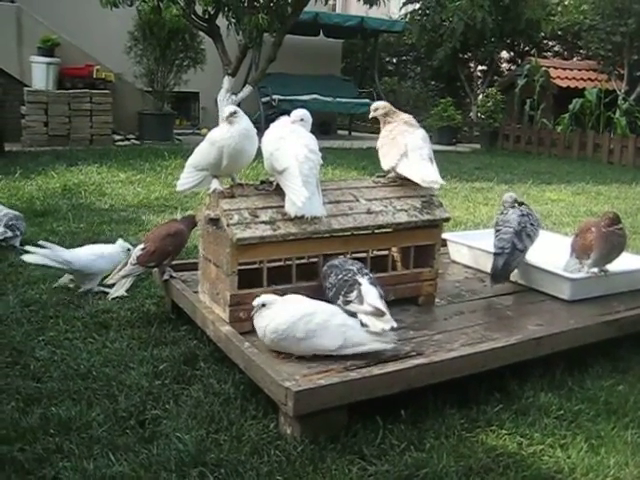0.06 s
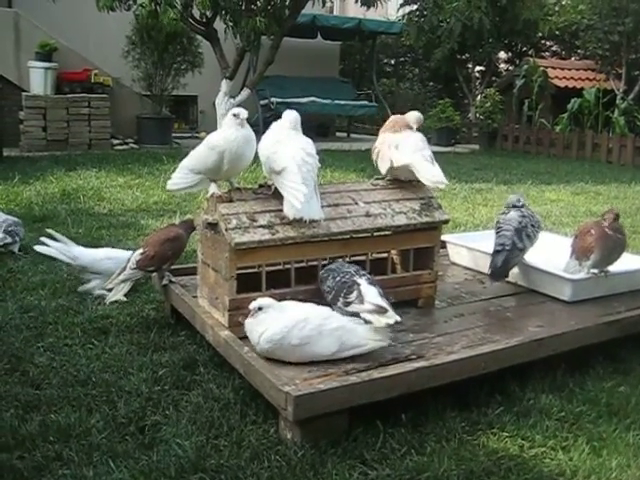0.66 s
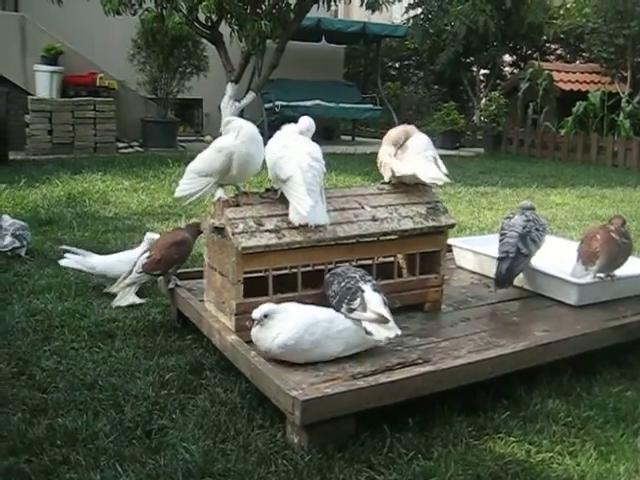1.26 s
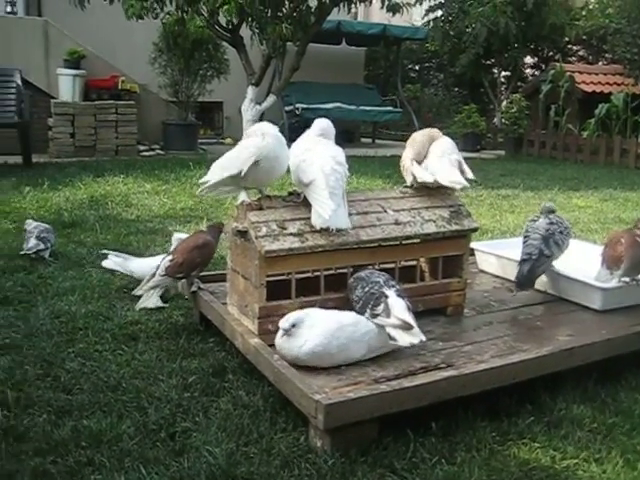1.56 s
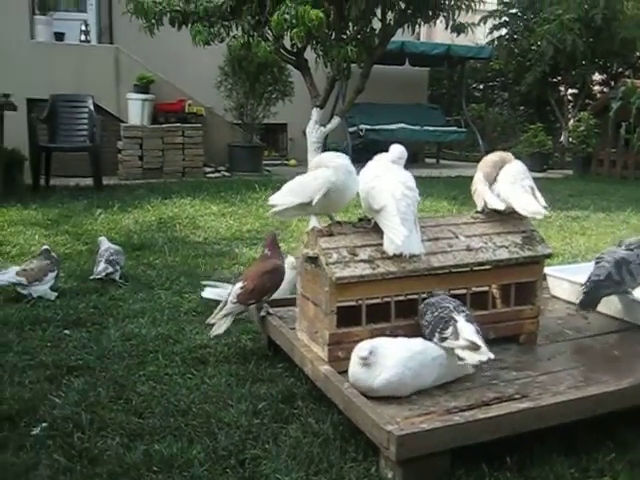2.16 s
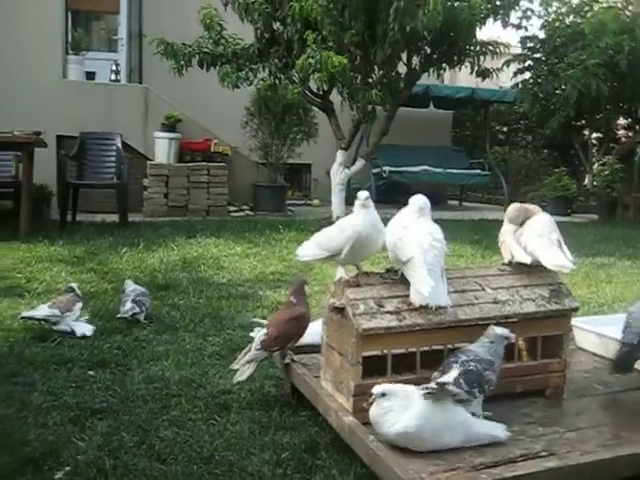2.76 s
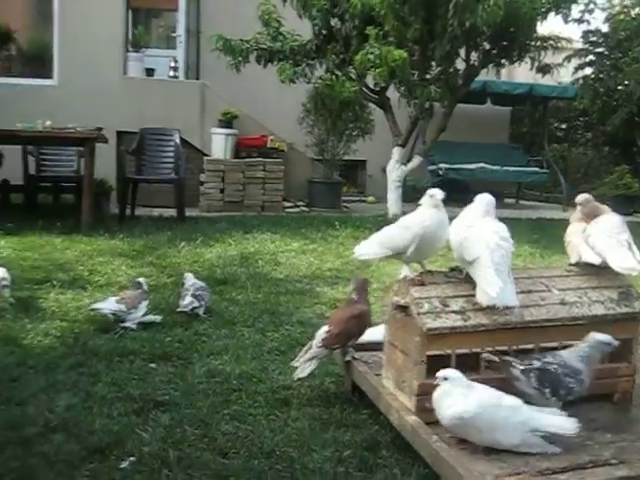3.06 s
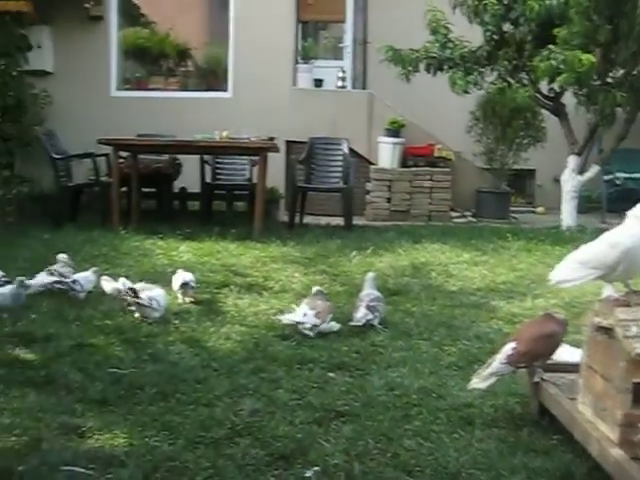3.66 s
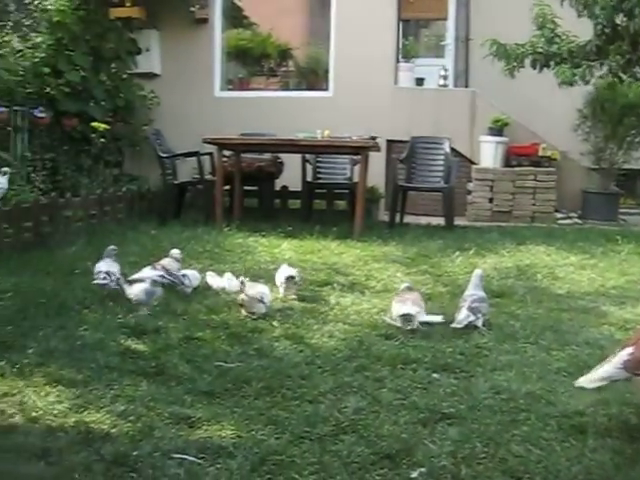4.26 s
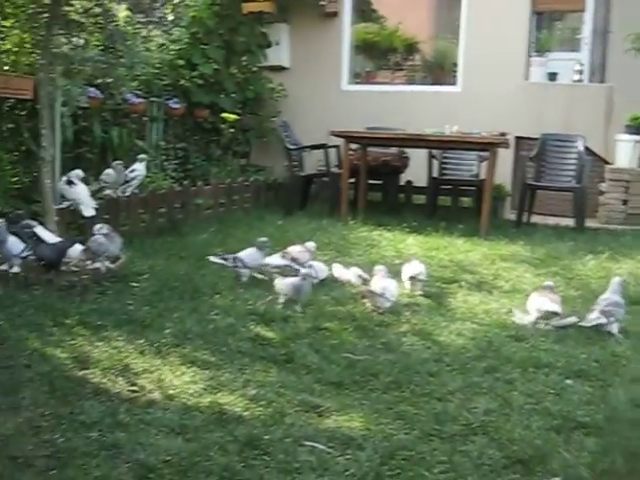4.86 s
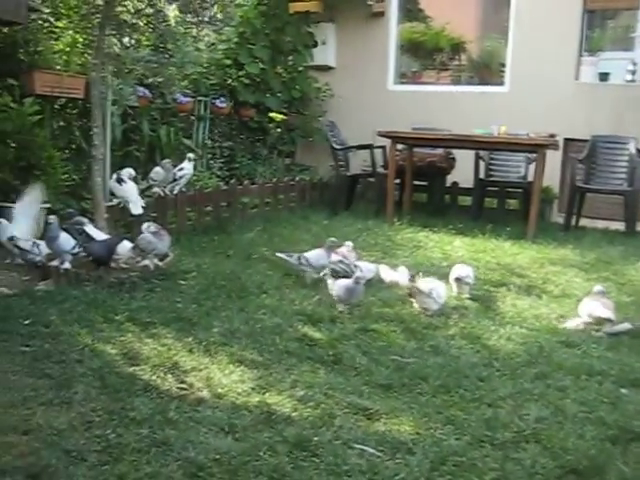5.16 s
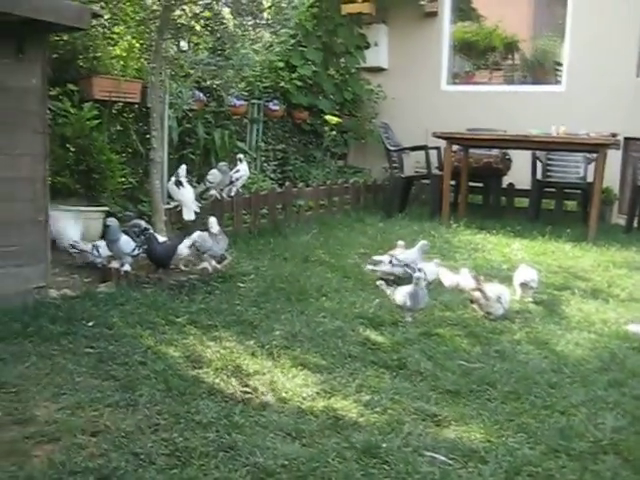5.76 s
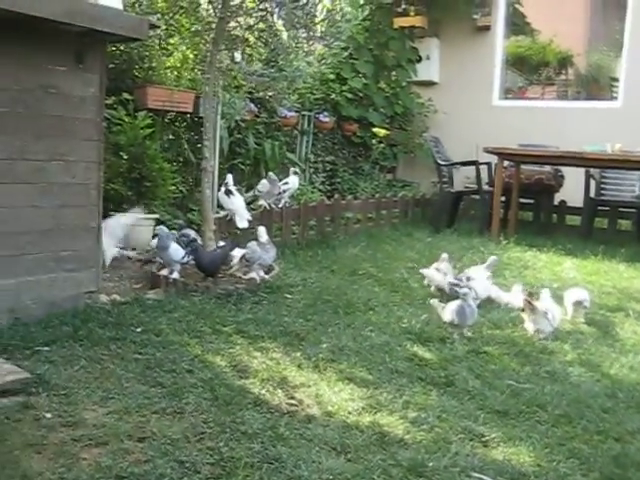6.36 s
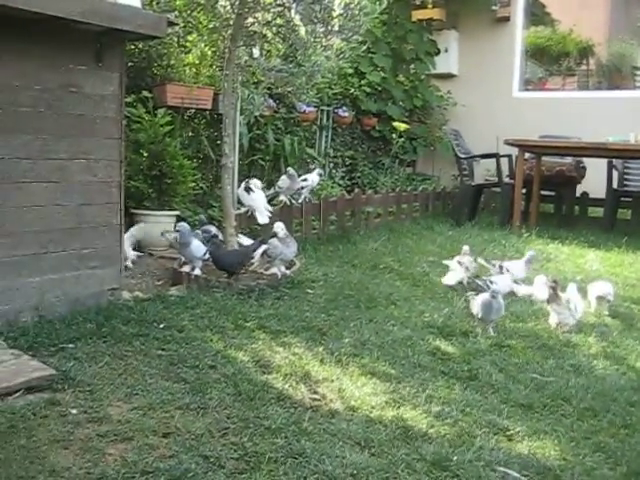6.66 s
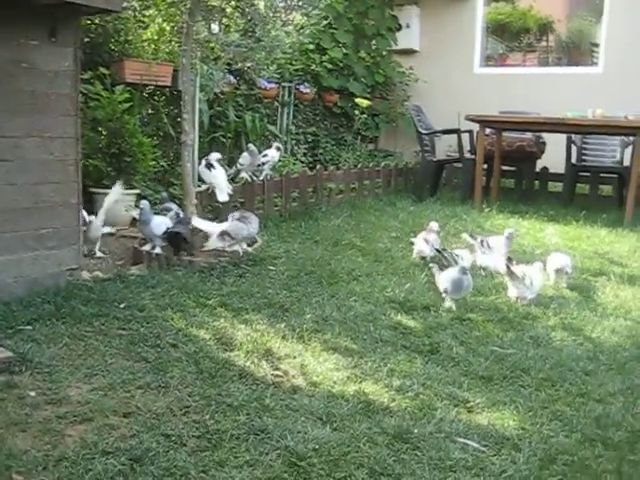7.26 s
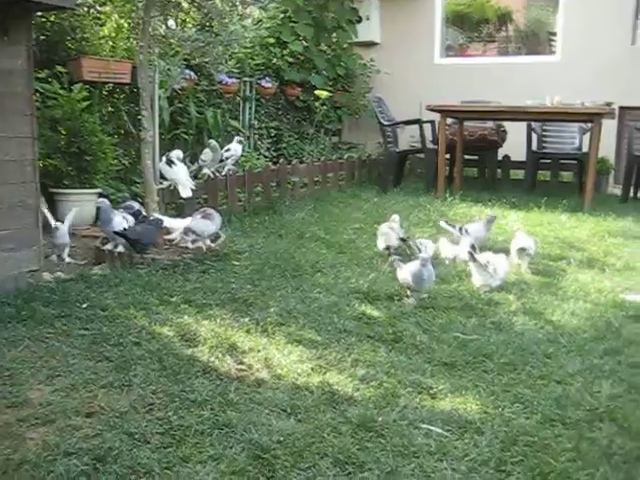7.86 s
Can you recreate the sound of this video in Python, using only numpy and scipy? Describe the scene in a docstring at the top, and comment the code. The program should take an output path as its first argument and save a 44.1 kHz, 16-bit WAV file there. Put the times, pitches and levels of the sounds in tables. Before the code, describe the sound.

A soft wash of outdoor air fills a walled garden for about eight seconds, heard through a small mono microphone with faint hiss and a thin, high whine. Sparrows chirrup in pairs roughly once a second, while other small birds add warbles and short whistles that echo lightly off the walls. Four dull, distant thuds come at about 0.8, 1.7, 2.4 and 3.1 seconds. Light ticks and soft feather rustles appear around 3 to 4 seconds. From 5.4 to 6.1 seconds a nearby pigeon takes off with six quick, loud wingbeats, each a sharp clap followed by a feathery swish, the strongest near 5.9. A single wing-tip snap follows at 6.4, then scattered dry ticks and rustles. At 7 seconds the plastic camera case gives one loud, sharp click, with a softer one at 7.6, as the chirping continues.

```python
"""A walled garden, heard through the mono microphone of a small camera.
A pigeon takes off with six wingbeats, each an impulsive clap followed by the hiss of feathers.
Sparrows chirrup in pairs and other small birds call, their gliding whistles reflected by the walls.
Dry ticks sound, perched birds rustle and distant blows thud over a wash of outdoor air.
The camera's case rings briefly in the hand, its electronics whine and its microphone hisses."""
import sys
import numpy as np
from scipy import signal
from scipy.fft import rfft, irfft
from scipy.io import wavfile
from scipy.ndimage import uniform_filter1d

SR = 44100
rng = np.random.default_rng(int(sys.argv[2]) if len(sys.argv) > 2 else 0)


def waveform_to_disk(signal):
    """Save audio, clipped to [-1, 1], as 16-bit WAV at the path in sys.argv[1]."""
    frames = np.transpose(np.atleast_2d(signal))
    scaled = np.clip(frames, -1, 1) * 32767
    samples = np.round(scaled).astype(np.int16)
    wavfile.write(sys.argv[1], SR, samples)


N = 352800
TIME = np.arange(N) / SR

# Pigeon wingbeats: start_s, first_slap_db, second_slap_db, gap_s, downstroke_db, upstroke_db
WINGBEATS = [(5.411, -21, -24, .003, -42, -50), (5.543, -12, -17, .0066, -36, -47),
             (5.680, -13, -18, .0038, -33, -45), (5.802, -18.5, -14, .004, -34.5, -40),
             (5.921, -6, -23, .005, -25.5, -30.5), (6.052, -13, -20, .008, -28.5, -34.5)]
# Strokes after each clap: delay_s, rise_s, decay_s, push_db (relative to the feather hiss)
DOWNSTROKE, UPSTROKE = (0.01, .003, 0.05, -7), (.078, 0.015, .024, 0)
# Modes of the air pocket between the wings: frequency_hz, level_db, t60_s
POCKET_MODES = [(548, -21, 0.036), (960, -22, 0.04)]
# Spectra of the clap, the feather hiss and the pushed air: frequency_hz, gain_db
CLAP_SPECTRUM = [(100, -38), (450, -6), (900, -9), (1500, -11.5), (2700, 0.5), (5400, -5), (7000, -8),
                 (10500, -8.5), (13500, -16), (16000, -19)]
FEATHER_SPECTRUM = [(200, -8), (700, -17), (1500, -9.5), (2700, -2.5), (5000, -3), (7500, -5.5),
                    (10500, -9), (15500, -22)]
PUSH_SPECTRUM = [(30, -31), (100, -23), (200, 2.5), (550, 3), (1000, -1), (2500, -21)]
# Perched birds shaking their feathers: start_s, level_db, rise_s, decay_s
RUSTLES = [(3.255, -45.5, .008, 0.04), (4.14, -37.5, .016, .026), (6.24, -46.5, 0.11, .2),
           (6.391, -33.5, .002, 0.022), (6.775, -34, .0024, .014), (7.795, -43.5, .021, 0.066)]
# Paired sparrow chirrups: start_s, level_db, repeat_db, echo_db
CHIRRUPS = [(.02, -39, -40.5, -8.5), (1.329, -42, -47, -2.5), (2.035, -40.5, -39.5, -4),
            (2.807, -39.5, -43.5, -4.5), (3.843, -37.5, -41.5, -6), (4.825, -39.5, -42.5, -2.5),
            (5.561, -36, -46, -6.5), (6.194, -36.5, -36.5, -7), (7.163, -40, -45, -4.5)]
# Calls from other perches, by kind: start_s, level_db, echo_db
SINGLE_CALLS = { "warble": [(.66, -37, -4.5), (1.13, -56.5, 7), (1.49, -39.5, -.5), (1.8, -58, 8.5),
                (2.026, -40.5, .5), (3.439, -41, 0), (4.619, -39, 1.5), (7.93, -45, -1)],
                "whit": [(1.467, -37.5, -8), (5.23, -32, -11)], "chup": [(2.975, -50, -8),
                (4.72, -48.5, 1.5), (5.31, -49, -3), (5.45, -46.5, -2), (7.315, -44, -2.5)],
                "seep": [(1.15, -59, 6), (1.67, -58, 3)], "tsit": [(.905, -55, -10), (1.3, -61, -3),
                (1.605, -57, -10), (2.305, -54, -8)]}
# Notes of each call: offset_s, length_s, from_hz, via_hz, to_hz, level_db, rasp_fraction (of pitch)
CALL_NOTES = { "chirrup": [(-.006, .04, 4500, 4350, 4270, -5.5, 0.065),
              (.026, 0.049, 4650, 4435, 3560, 2.5, 0.047), (.069, .019, 3980, 3604, 2820, 3, .035),
              (.089, 0.046, 3150, 3410, 2450, 3, 0.026)],
              "warble": [(.013, .052, 3690, 5395, 4760, -3, .045),
              (.059, 0.0249, 4800, 3550, 4450, -.3, .026), (.084, .04, 3550, 3850, 4650, 3.5, .02),
              (.124, 0.0239, 3600, 3100, 3100, -5, .025)],
              "whit": [(-.004, .018, 2700, 3597, 4404, -9, .02), (.01, 0.0181, 4350, 4660, 4950, 8, 0.024)],
              "chup": [(0, 0.07, 3100, 2700, 2500, 2.5, 0.059)],
              "seep": [(0, .06, 5500, 5850, 5900, 0, .025)],
              "tsit": [(0, 0.024, 7900, 8680, 8400, 3, .014)]}
# Contacts on the camera case: start_s, level_db, focus_hz
CASE_CONTACTS = [(7.0362, -20, 3300), (7.0528, -3, 3010), (7.6428, -18, 3980), (7.644, -19.5, 785)]
# Modes of the case: frequency_hz, level_db, t60_s
CASE_MODES = [(532, -8, 0.044), (1005, -3, 0.031), (1590, -6.5, 0.015), (2450, 2, 0.012),
              (2700, -0.5, 0.014), (3000, -8.5, 0.026), (3630, -1, 0.013), (4350, -0.5, 0.0066),
              (5680, -5, 0.0064), (9600, -12, .004)]
# Sharp dry ticks, the loudest a single wing-tip snap: start_s, level_db, centre_hz, decay_s
DRY_TICKS = [(2.86, -34.5, 3000, .0039), (3.971, -31.5, 2400, 0.0041), (4.092, -35, 2570, .0045),
             (6.3915, -14, 5150, 0.0015), (6.569, -38, 8500, .003), (6.585, -29, 4500, .003),
             (6.584, -33, 710, .0028), (6.952, -28, 9700, 0.0017), (7.327, -33, 7000, .004),
             (7.351, -37, 7000, .005), (7.352, -29.5, 2700, .0029), (7.8194, -28, 6400, 0.00084),
             (7.828, -34, 1260, 0.0049)]
# Distant blows: start_s, level_db, rise_s, decay_s, hollow_hz, hollow_db
THUDS = [(.785, -41.5, .06, 0.12, 760, -4.5), (1.69, -38.5, .0032, 0.026, 280, -6),
         (2.39, -41, 0.014, 0.067, 310, -5.5), (3.052, -37, 0.017, 0.14, 320, -10.5)]
# Spectra of the thuds, the garden air and the microphone hiss: frequency_hz, gain_db
THUD_SPECTRUM = [(60, -15), (130, -26), (200, 4), (450, -1.5), (800, 3), (1300, -2), (2100, -2),
                 (3200, -14.5), (6000, -44)]
AIR_SPECTRUM = [(15, -35), (25, -11), (60, -1), (92, 2), (200, 3.5), (315, 4), (400, 2.5), (750, 2),
                (1020, 1.5), (1900, -4), (2840, -5), (4490, -5.5), (7000, -12), (10000, -23)]
HISS_SPECTRUM = [(3000, 0), (7400, 0), (7900, 4), (8400, 1), (10000, -1), (12200, -4), (13600, -.5),
                 (14800, -2.5), (15700, -6.5)]
# Slow course of the garden air: time_s, level_db
AIR_LEVELS = [(0, -48.5), (2, -48), (4, -47), (5.2, -46.5), (6.5, -48.5), (8, -47.5)]
# Partials of the electronic whine: harmonic_number, rms_db
WHINE_PARTIALS = [(1, -57), (2, -57)]
# Reverberation time of the garden: frequency_hz, t60_s
GARDEN_T60 = [(200, 0.81), (2000, 0.89), (4000, 1), (8000, 0.61), (16000, 0.33)]


def pigeon_wings():
    """Impact and airflow: a wingbeat is a double slap and two strokes; perched birds only rustle."""
    out = np.zeros(N)
    for start, first_db, second_db, gap, down_db, up_db in WINGBEATS:
        add(out, start, gain_of(first_db) * wing_slap())
        add(out, start + gap, gain_of(second_db) * wing_slap())
        for db, (delay, rise, decay, push_db) in (down_db, DOWNSTROKE), (up_db, UPSTROKE):
            add(out, start + delay, gain_of(db) * feather_swish(rise, decay, push_db))
    for start, db, rise, decay in RUSTLES:
        add(out, start, gain_of(db) * feather_swish(rise, decay, push_db=-11.5))
    return out


def wing_slap(snap=2.0, clatter=0.56, snap_gap_s=.00035):
    """Impulse excitation: the wing tips snap, the quills clatter and the air between them resonates."""
    t = TIME[:SR // 8]
    impact = clatter * rng.standard_normal(len(t)) * swell(t, rise_s=0.00091, decay_s=.0028)
    impact[0] += snap
    impact[round(snap_gap_s * rng.uniform(.6, 1.6) * SR)] -= snap
    pop = sum(gain_of(db - 60 * t / t60) * np.sin(2 * np.pi * hz * rng.uniform(0.98, 1.03) * t)
              for hz, db, t60 in POCKET_MODES)
    click = minimum_phase_click(CLAP_SPECTRUM, tilt_db=-0.4)
    return signal.fftconvolve(impact, click)[:len(t)] + pop


def feather_swish(rise_s, decay_s, push_db, grain_db=2.0):
    """Friction noise: feathers hiss as they slide past each other, and push air with a lower rush."""
    t = TIME[:SR // 2]
    barbs = rng.standard_normal(len(t)) * gain_of(grain_db * wander(len(t), 350))
    push = gain_of(push_db) * coloured(rng.standard_normal(len(t)), PUSH_SPECTRUM)
    return (coloured(barbs, FEATHER_SPECTRUM) + push) * swell(t, rise_s, decay_s)


def small_birds(repeat_s=.169, repeat_echo_db=-5, repeat_fade_db_per_s=25):
    """Direct and reflected sound: each call arrives with its own pattern of garden echoes."""
    calls = [(kind, *row, 0) for kind, rows in SINGLE_CALLS.items() for row in rows]
    for start, db, repeat_db, echo_db in CHIRRUPS:
        calls.append(("chirrup", start, db, echo_db, 0))
        calls.append(("chirrup", start + repeat_s, repeat_db,
                      echo_db + repeat_echo_db, repeat_fade_db_per_s))
    out = np.zeros(N)
    for kind, start, db, echo_db, fade in calls:
        voice = gain_of(db) * syrinx(kind, fade)
        direct = voice if kind == "whit" else branch_scatter(voice)  # the whit has a near, open perch
        add(out, start, direct)
        add(out, start, gain_of(echo_db) * garden_echoes(np.pad(voice, (0, SR // 2))))
    return out


def syrinx(kind, fade_db_per_s, flutter_db=2.5, overtone_db=-30, second_db=-11, second_ratio=1.2):
    """Frequency modulation roughens a gliding whistle; the syrinx's other half joins on low notes."""
    out = np.zeros(SR // 5)
    for offset, length, from_hz, via_hz, to_hz, db, rasp in CALL_NOTES[kind]:
        size = round(length * SR)
        progress = np.linspace(0, 1, size)
        arc = np.polyfit([0, .5, 1], [from_hz, via_hz, to_hz], 2)
        pitch_hz = np.polyval(arc, progress) * (1 + .01 * rng.standard_normal())
        waver, second_gain, flutter = (wander(len(out), hz)[:size] for hz in (566, 190, 330))
        phase = 2 * np.pi * np.cumsum(pitch_hz * (1 + rasp * waver)) / SR
        low_notes = uniform_filter1d((pitch_hz * second_ratio < 4900) * 1., SR // 300)
        voice = np.sin(phase) + gain_of(overtone_db) * np.sin(2 * phase)
        voice += gain_of(second_db) * np.sin(second_ratio * phase) * second_gain * low_notes
        envelope = abs(np.sin(np.pi * progress ** 1.4)) ** 0.91  # peaks past the middle
        level_db = db + flutter_db * flutter - fade_db_per_s * offset
        add(out, offset, voice * envelope * gain_of(level_db))
    return out


def branch_scatter(x, scatter=.5, count=6):
    """Multipath interference: late arrivals by way of branches and eaves break up a gliding tone."""
    paths = np.zeros(SR // 40)
    strengths = scatter * rng.choice([-1., 1.], count) / np.sqrt(count)
    paths[rng.integers(SR // 1000, len(paths), count)] = strengths
    paths[0] = 1
    return signal.fftconvolve(x, paths / np.linalg.norm(paths))


def case_clicks(contact_s=0.0002, falloff_db_per_octave=8):
    """Modal ringing: each contact on the plastic case favours the damped modes near one frequency."""
    out, t = np.zeros(N), TIME[:SR // 16]
    for start, db, focus_hz in CASE_CONTACTS:
        ring = np.zeros(len(t))
        for k, (hz, mode_db, t60) in enumerate(CASE_MODES):
            drive_db = mode_db - falloff_db_per_octave * abs(np.log2(hz / focus_hz))
            ring += (-1) ** k * gain_of(drive_db - 60 * t / t60) * np.sin(2 * np.pi * hz * t)
        add(out, start, gain_of(db) * ring * np.minimum(t / contact_s, 1))
    return out


def dry_ticks(q=1.6, faint_per_s=1.2, faint_db=-47, faint_decay_s=.006):
    """Resonant filtering: each tick is a brief burst of noise through one broad resonance."""
    out, t = np.zeros(N), TIME[:SR // 8]
    faint_starts = TIME[rng.random(N) < faint_per_s / SR]
    faint = [(start, faint_db, 7500 * rng.uniform(0.71, 1.2), faint_decay_s) for start in faint_starts]
    for start, db, hz, decay in DRY_TICKS + faint:
        crackle = signal.lfilter(*signal.iirpeak(hz, q, SR), rng.standard_normal(len(t)))
        add(out, start, gain_of(db) * unit_rms(crackle) * swell(t, 0.00022, decay))
    return out


def distant_thuds(width_hz=40):
    """Diffuse reflection: houses blur far blows into dull bursts with a hollow note and rolling tail."""
    out, t = np.zeros(N), TIME[:SR]
    tail = gain_of(-13.5) * swell(t, rise_s=.15, decay_s=0.17)
    for start, db, rise, decay, hollow_hz, hollow_db in THUDS:
        phase = 2 * np.pi * hollow_hz * t
        hollow = unit_rms(wander(SR, width_hz) * np.cos(phase) + wander(SR, width_hz) * np.sin(phase))
        burst = coloured(rng.standard_normal(SR), THUD_SPECTRUM) + gain_of(hollow_db) * hollow
        add(out, start, gain_of(db) * burst * np.hypot(swell(t, rise, decay), tail))
    return out


def garden_air(drift_db=1.35):
    """Ambient noise: a broad outdoor wash whose level drifts a little."""
    level_db = np.interp(TIME, *np.transpose(AIR_LEVELS)) + drift_db * wander(N, 7.5)
    return gain_of(level_db) * coloured(rng.standard_normal(N), AIR_SPECTRUM)


def microphone_hiss(level_db=-54.8):
    """Self-noise: the microphone adds a steady hiss."""
    return gain_of(level_db) * coloured(rng.standard_normal(N), HISS_SPECTRUM)


def camera_whine(pitch_hz=7568.6, frames_per_s=30, first_frame_s=.0066):
    """Phase resetting: an electronic tone restarts with every picture frame and so gains sidebands."""
    phase = 2 * np.pi * pitch_hz * ((TIME - first_frame_s) % (1 / frames_per_s))
    return sum(gain_of(db) * np.sqrt(2) * np.sin(k * phase) for k, db in WHINE_PARTIALS)


def garden_echoes(x, wall_gain=0.62, count=14):
    """Reverberation: a few hard reflections from the walls, and a diffuse tail from leaves and houses."""
    taps = rng.choice([-1., 1.], SR) * (rng.random(SR) < .08)
    onset = np.minimum(TIME[:SR] / 0.013, 1)
    hz, t, bands = signal.stft(taps * onset, SR, nperseg=256)
    decay = gain_of(-60 * t / log_interp(GARDEN_T60, hz)[:, None])
    response = signal.istft(bands * decay, SR, nperseg=256)[1]
    response /= np.linalg.norm(response)
    wall_delays = rng.integers(SR // 200, SR // 16, count)
    response[wall_delays] += wall_gain * rng.choice([-1., 1.], count) / np.sqrt(count)
    return signal.fftconvolve(x, response / np.linalg.norm(response))[:N]


def minimum_phase_click(spectrum, tilt_db, size=2048):
    """Minimum phase packs a tilted spectrum into a sharp-fronted click of unit energy."""
    hz = abs(np.fft.fftfreq(size, 1 / SR))
    log_gain = np.log(gain_of(log_interp(spectrum, hz) + tilt_db * np.log2(hz / 3000 + 0.076)))
    click = np.fft.ifft(np.exp(np.conj(signal.hilbert(log_gain)))).real[:size // 2]
    return click / np.linalg.norm(click)


def coloured(x, spectrum):
    """Spectral shaping, at rms 1."""
    hz = np.fft.rfftfreq(len(x), 1 / SR)
    return unit_rms(irfft(rfft(x) * gain_of(log_interp(spectrum, hz)), len(x)))


def wander(size, cutoff_hz):
    """Low-pass noise of rms 1."""
    hz = np.fft.rfftfreq(size, 1 / SR)
    return unit_rms(irfft(rfft(rng.standard_normal(size)) / (1 + (hz / cutoff_hz) ** 4), size))


def swell(t, rise_s, decay_s):
    """Linear rise to 1, then exponential decay."""
    return np.minimum(t / rise_s, 1) * np.exp(-np.maximum(t - rise_s, 0) / decay_s)


def log_interp(points, hz):
    """Interpolation on a log-frequency axis."""
    point_hz, values = np.transpose(points)
    return np.interp(np.log(hz + 1), np.log(point_hz + 1), values)


def gain_of(db):
    """Decibels to amplitude."""
    return 10 ** (np.asarray(db) / 20)


def unit_rms(x):
    """Normalisation to rms 1."""
    return x / np.sqrt(np.mean(x ** 2) + 1e-20)


def add(mix, start_s, sound):
    """Superposition of a sound on the mix."""
    part = mix[max(round(start_s * SR), 0):][:len(sound)]
    part += sound[:len(part)]


def scene():
    """Superposition: all sources sum at one microphone, the same in both channels."""
    near = pigeon_wings() + dry_ticks()
    mono = near + gain_of(-12) * garden_echoes(near) + small_birds() + case_clicks()
    mono += distant_thuds() + garden_air() + microphone_hiss() + camera_whine()
    return np.array([mono, mono])


def record(dry, ceiling=0.63, threshold_db=-13, recovery_db_per_s=220, cutoff_hz=15850):
    """Overload: the tallest peaks clip, a fast limiter ducks after them and a low-pass limits the band."""
    power = signal.lfilter([1 / 64], [1, 1 / 64 - 1], dry[0] ** 2)
    recovery_db = TIME * recovery_db_per_s
    held_db = np.maximum.accumulate(10 * np.log10(power + 1e-12) + recovery_db) - recovery_db
    over_db = np.maximum(held_db - threshold_db, 0)
    duck_db = signal.lfilter([1 / 80], [1, 1 / 80 - 1], over_db)
    limited = np.clip(dry / gain_of(duck_db), -ceiling, ceiling)
    low_pass = signal.firwin(511, cutoff_hz, window=("kaiser", 9), fs=SR)
    return signal.oaconvolve(limited, low_pass[None], "same", axes=1)


dry = scene()
out = record(dry)
waveform_to_disk(out)
```